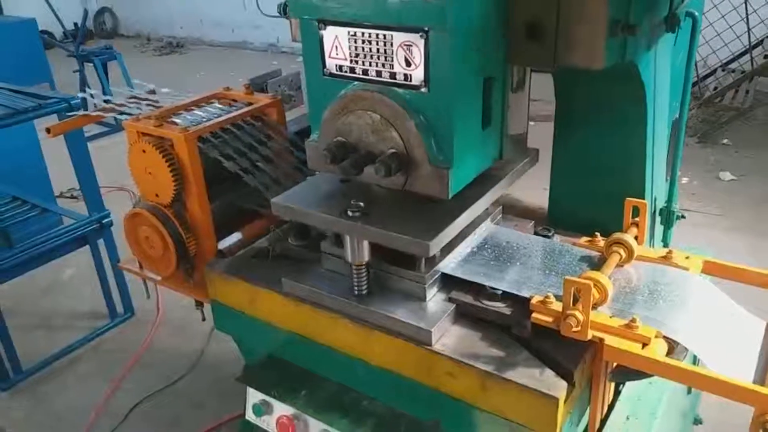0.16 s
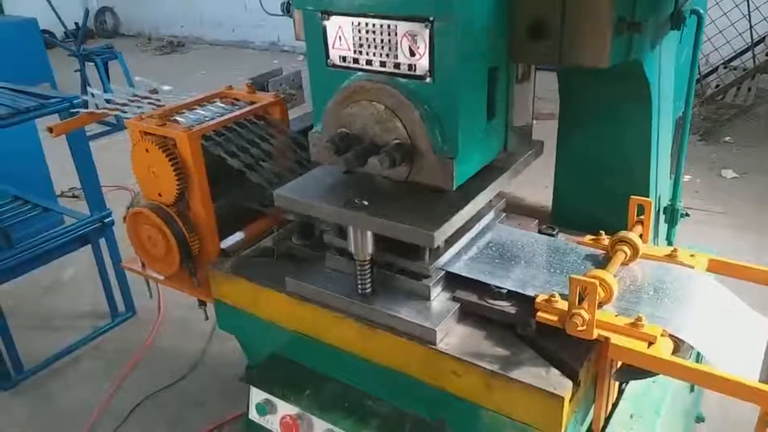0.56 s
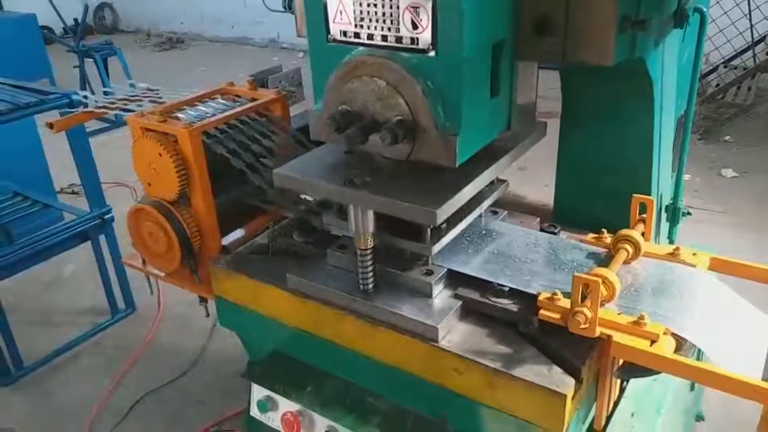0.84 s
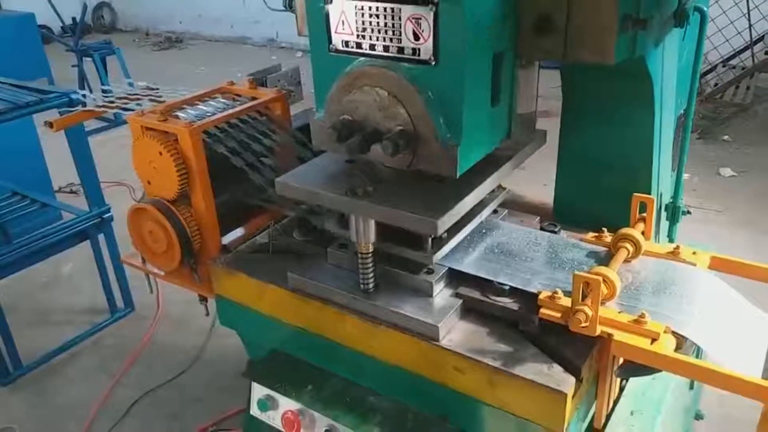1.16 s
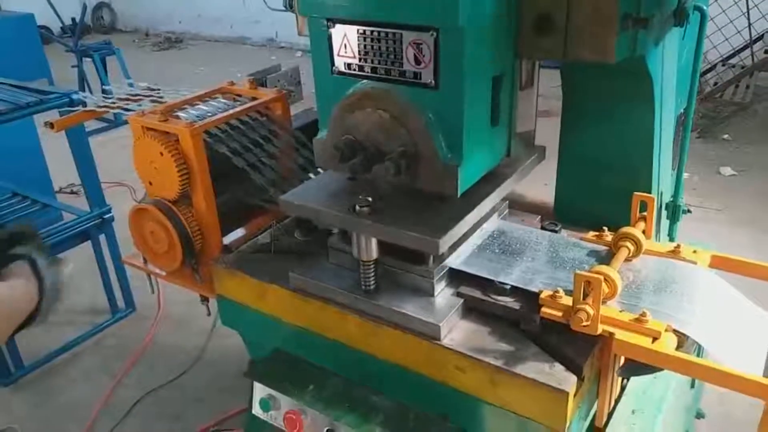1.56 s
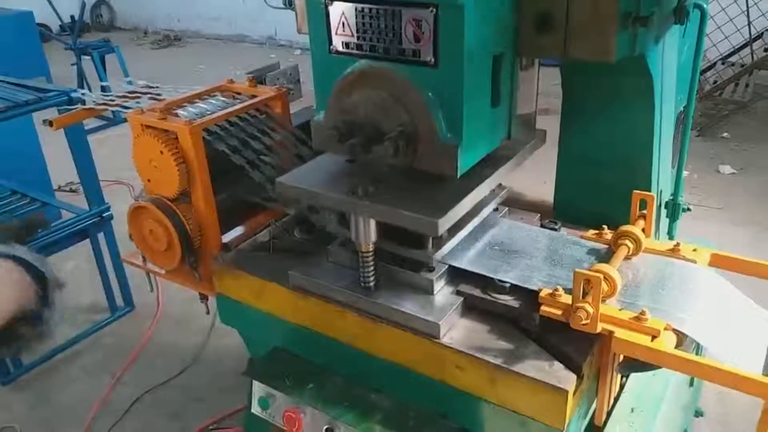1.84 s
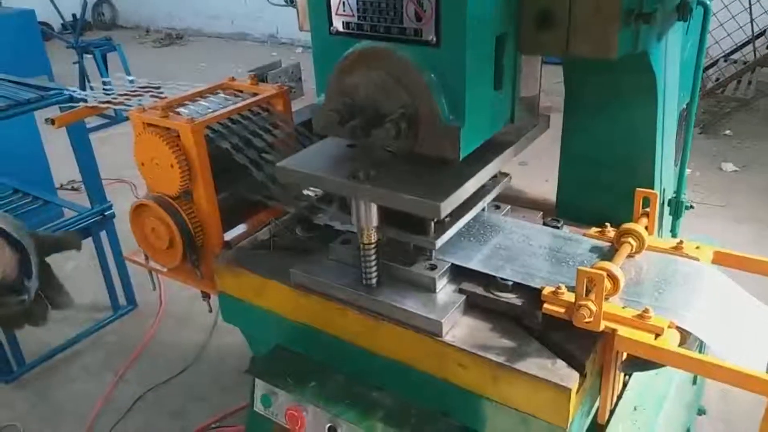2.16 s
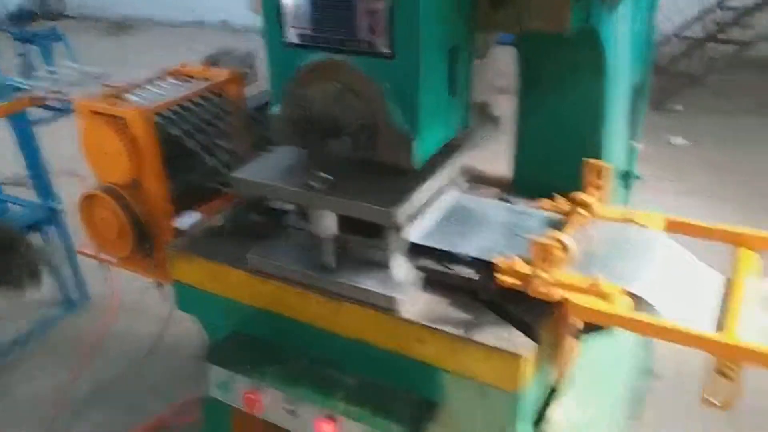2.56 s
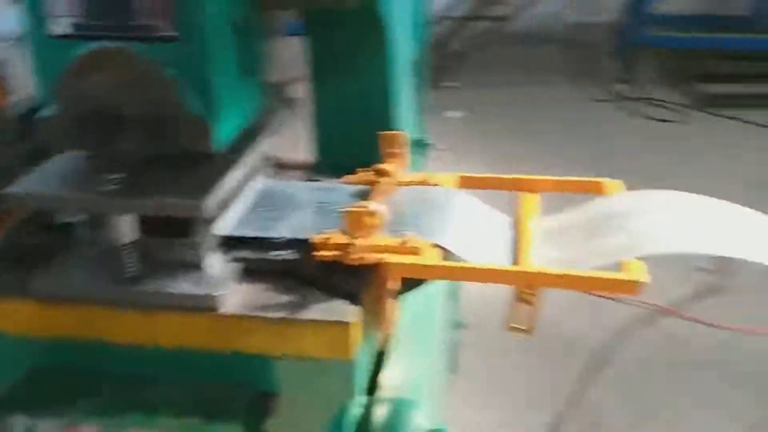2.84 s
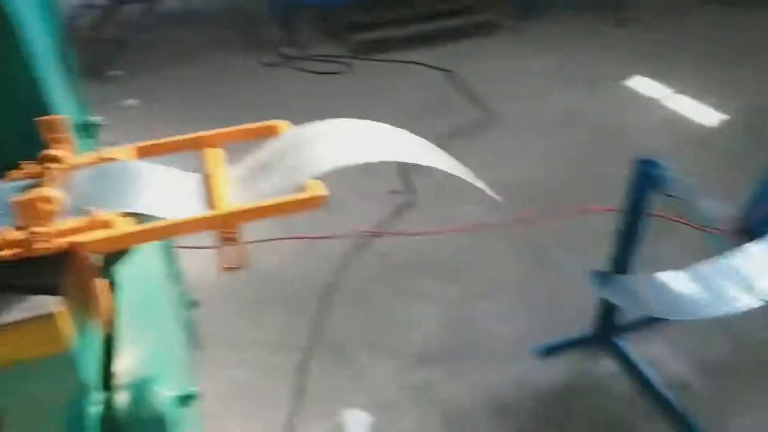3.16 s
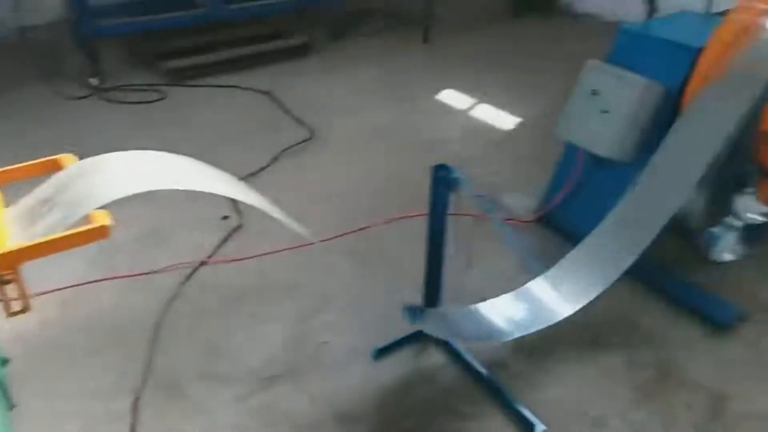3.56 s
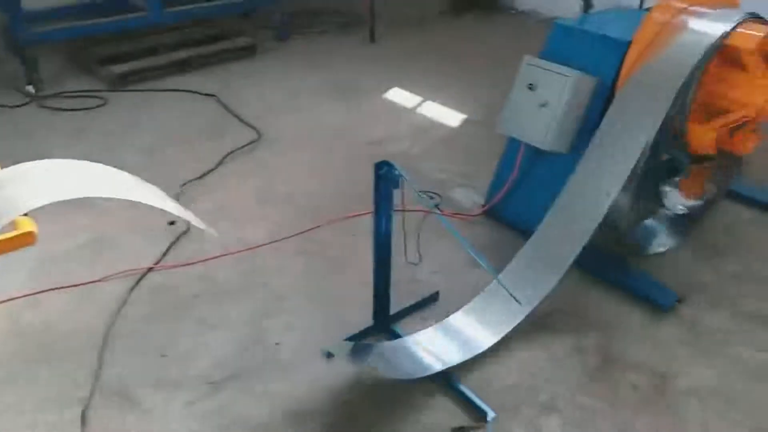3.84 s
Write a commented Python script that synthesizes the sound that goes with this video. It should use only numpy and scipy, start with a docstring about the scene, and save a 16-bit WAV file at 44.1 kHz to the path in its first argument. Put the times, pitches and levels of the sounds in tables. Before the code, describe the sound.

Heavy, regular bangs of a punch press echo through a workshop, with gear rumble between.

```python
"""Punch press, close up

Stereo microphone close to a press stamping sheet metal every 1.2 s in a hard-walled workshop. Gears roar,
the die knocks shut, the punch cracks through, frame and hall ring, the stripper clacks, the strip rattles.
Loose parts tick; late on, the strip unwinder rises to a shuddering hum. A limiter holds the blows down."""
import sys
import numpy as np
from scipy import signal
from scipy.io import wavfile
from scipy.ndimage import uniform_filter1d, minimum_filter1d

SR = 44100
rng = np.random.default_rng(int(sys.argv[2]) if len(sys.argv) > 2 else 0)


def int16_out(signal):
    """Quantize to a 16-bit WAV file."""
    q = np.round(np.clip(np.atleast_2d(signal).T, -1, 1) * 32767)
    wavfile.write(sys.argv[1], SR, q.astype(np.int16))


N = 176400

# The punch breaking through: start_s, level_db
BLOWS = [(.141, -1.5), (1.3345, -0.5), (2.529, -1), (3.723, -1.5)]
# The hall's answer to a blow: frequency_hz, level_db
BLOW_SPECTRUM = [(25, -51), (130, -30), (280, 8.5), (546, -11), (815, -3), (1450, -12), (2340, -16),
                 (5000, -31.5), (7590, -38.5), (10000, -74.5)]
# Die plates slamming inside the crack: after_blow_s, nominal_pitch_hz, level_db, t60_s
PLATE_SLAMS = [(0, 392.5, -1.5, 0.14), (.015, 890, 7, 0.02)]
# Modes of the press frame: pitch_hz, level_db, t60_s
FRAME_MODES = [(124.4, -16, 0.84), (228.4, -8.5, 0.95), (273.4, -6, 0.59), (324.3, -3.5, 0.51),
               (483.5, -7.5, 0.73), (630, -0.5, 0.41), (824, -1.5, 0.81), (999, 1.5, 0.21),
               (1318, -8.5, 0.49)]
# Die and stripper contacts: from_blow_s, level_db, brightness (0 dull, 1 sharp)
STROKE_KNOCKS = [(-.11, -22, 0.82), (-.09, -20.5, 0.69), (-.055, -11.5, 0.061), (.146, -19.5, 0.66),
                 (0.161, -17.5, 0.84)]
# A dull thump: frequency_hz, level_db
DULL_SPECTRUM = [(60, -10), (280, 26), (500, 20), (2000, -46), (10000, -51)]
# Sharp metal contact: frequency_hz, level_db
SHARP_SPECTRUM = [(60, -43.5), (300, -4), (800, -8), (2200, 4.5), (4000, -8.5), (7000, -20.5), (10000, -51)]
# Gear roar over one stroke: from_next_blow_s, level_db
GEAR_LOAD = [(-1.257, -21), (-0.85, -27.5), (-0.462, -45), (-0.35, -34), (-0.099, -27), (-0.026, -22)]
# Meshing teeth: frequency_hz, level_db
GEAR_SPECTRUM = [(25, -54), (120, -31), (233, 0.5), (500, -15), (800, 5.5), (1310, -4.5), (2400, -3),
                 (2720, -14), (5760, -19), (9280, -49), (10000, -84)]
# Modes of the sheet-metal strip: pitch_hz
STRIP_MODES = [2720, 3520, 3840, 4930, 5650, 6080, 7970, 8350]
# The unwinder's swell: time_s, level_db
UNWINDER_LEVEL = [(3.28, -36), (3.325, -21), (3.45, -17), (3.56, -15.5), (3.68, -13), (3.8, -22.5),
                  (4, -44.5)]
# Its motor hum: time_s, pitch_hz
UNWINDER_PITCH = [(3.5, 221.4), (3.65, 241.3), (3.8, 263)]
# Resonances of its stand: pitch_hz, width_hz, level_db
STAND_MODES = [(123.5, 20, -2.5), (170, 9.9, -6), (234.5, 24.2, 3.5), (292, 43, -11)]
# Loose parts: start_s, level_db
TICKS = [(0.0723, -25), (0.5017, -36.5), (.593, -35), (1.7791, -27.5), (1.799, -28), (1.834, -31),
         (2.764, -38.5), (2.886, -37), (2.946, -36), (3.032, -38), (3.53, -38), (3.618, -27),
         (3.842, -31.5)]
# One tick: frequency_hz, level_db
TICK_SPECTRUM = [(300, -39), (1500, -10), (3300, 2), (5500, 1), (7500, -10.5), (10000, -29)]
# The strip dragging over its guides: time_s, level_db
SCRAPE_LEVEL = [(2.7, -38), (2.95, -35), (3.25, -32), (3.6, -24), (3.9, -37)]
# The strip singing after a blow, struck by it: pitch_hz, level_db, t60_s
STRIP_RING_MODES = [(7390, -38, .5), (7720, -44, .4)]
# Workshop room tone: frequency_hz, level_db
DRONE_SPECTRUM = [(60, -37), (140, -26.5), (284, -4.5), (532, 4), (924, 6.5), (2400, -5.5), (5760, -38.5),
                  (8600, -55.5), (10000, -78.5)]
# Reverberation of the hall: frequency_hz, t60_s
HALL_DECAY = [(60, 0.19), (250, 1.55), (800, 2.08), (2000, 1.74), (4000, 1.35), (9000, 0.93)]
# Likeness of left and right at the microphone: frequency_hz, correlation
STEREO_LIKENESS = [(60, -0.9), (140, 1), (330, 0.95), (760, 0.61), (1760, -0.29), (9560, 0.46)]


def amp(db):
    return 10 ** (np.asarray(db) / 20)


def unit_rms(x):
    return x / np.sqrt(np.mean(x ** 2) + 1e-20)


def at_hz(points, hz):
    """Read a table along a logarithmic frequency axis."""
    table_hz, value = np.transpose(points)
    return np.interp(np.log(hz + 1), np.log(table_hz + 1), value)


def at_time(points, t):
    return np.interp(t, *np.transpose(points))


def add(mix, start_s, sound):
    part = mix[:, max(round(start_s * SR), 0):][:, :sound.shape[1]]
    part += sound[:, :part.shape[1]]


def resonate(x, hz, width_hz):
    """A fixed resonance of gain 1."""
    turn = np.exp(2j * np.pi * hz * np.arange(x.shape[-1]) / SR)
    pole = np.exp(-np.pi * width_hz / SR)
    return 2 * (turn * signal.lfilter([1 - pole], [1, -pole], x / turn)).real


def snap(count, boost_db=7, fade_s=.006):
    """Gain that sharpens the first milliseconds of a contact."""
    return amp(boost_db * np.exp(-np.arange(count) / (fade_s * SR)))


def hall_noise(count, colour_db, ring=np.inf, patchy_db=3.5, steel_db=5.5):
    """Stereo noise starting near rms 1; each band dies away in ring times the hall's t60."""
    frames, hz = count // 128 + 5, np.fft.rfftfreq(512, 1 / SR)
    a, b, c, d, patches, steel = rng.standard_normal((frames, 257, 6)).T
    # Narrow, slowly shifting resonances of the steel, at full depth above 1500 Hz.
    steel = unit_rms(uniform_filter1d(steel, size=30, axis=1)) * np.minimum(hz / 1500, 1)[:, None]
    patches = unit_rms(uniform_filter1d(uniform_filter1d(patches, size=5, axis=0), size=20, axis=1))
    likeness = np.clip(at_hz(STEREO_LIKENESS, hz), -1, 1)[:, None]
    left = a + 1j * b
    right = likeness * left + np.sqrt(1 - likeness ** 2) * (c + 1j * d)
    ripple_db = patchy_db * np.clip(patches, -3, 1.5) + steel_db * np.clip(steel, -3, 2)
    spectra = np.array([left, right]) * amp(colour_db(hz)[:, None] + ripple_db)
    rms = np.sqrt(np.mean(signal.istft(spectra, nperseg=512, noverlap=384)[1] ** 2))
    spectra *= amp(-60 * np.arange(frames) * 128 / SR / (ring * at_hz(HALL_DECAY, hz))[:, None])
    return signal.istft(spectra, nperseg=512, noverlap=384)[1][:, :count] / rms


def blows(crack_s=.0235, crack_db=6, body_db=-8.5):
    """The punch cracks through as the die plates slam; the frame rings and the hall answers."""
    out, t = np.zeros((2, N)), np.arange(SR) / SR
    short = t[:2048]
    gate = np.clip((crack_s + .001 - short) / .002, 0, 1) * np.minimum(short / .0005, 1)
    brightened = lambda hz: at_hz(BLOW_SPECTRUM, hz) + 4 * np.log2(hz + 500)
    for start_s, db in BLOWS:
        crack = hall_noise(len(short), brightened, ring=.1)
        for late_s, hz, slam_db, t60 in PLATE_SLAMS:
            age = np.maximum(short - late_s, 0)
            pitch_hz = hz * rng.uniform(.87, 1.05)
            crack += amp(slam_db - 60 * age / t60) * np.sin(2 * np.pi * pitch_hz * age)
        add(out, start_s, amp(db + crack_db) * gate * unit_rms(crack) * snap(len(short)) ** .5)
        hall = hall_noise(SR, lambda hz: at_hz(BLOW_SPECTRUM, hz), ring=.68)
        body = hall + amp(-10.5) * frame_ring(SR)
        add(out, start_s, amp(db + body_db) * np.minimum(t / .0011, 1) * body)
    return out


def frame_ring(count, ring=1):
    """All frame modes start at once, weighted a little differently each time; ring scales their t60."""
    t = np.arange(count) / SR
    hz, db, t60 = np.transpose(FRAME_MODES)[:, :, None]
    weight, phase = rng.random((2, len(FRAME_MODES), 1))
    modes = amp(db + 4.2 * weight - 60 * t / (ring * t60)) * np.sin(2 * np.pi * (hz * t + phase))
    return modes.sum(0) * np.minimum(t / .0028, 1)


def knocks():
    """The die's smaller contacts repeat around every blow, from dull thump to sharp clack."""
    out, t = np.zeros((2, N)), np.arange(SR // 4) / SR
    for blow_s, _ in BLOWS:
        for offset_s, db, bright in STROKE_KNOCKS:
            colour = lambda hz: (bright * at_hz(SHARP_SPECTRUM, hz)
                                 + (1 - bright) * at_hz(DULL_SPECTRUM, hz))
            rise = np.minimum(t / (.0005 + .025 * (1 - bright) ** 2), 1)  # dull thumps swell in
            knock = rise * snap(len(t)) ** bright * hall_noise(len(t), colour, ring=.13)
            add(out, blow_s + offset_s, amp(db) * knock)
    return out


def gears(taps_per_s=640, spread_db=4, rattle_db=-1.5):
    """Tooth noise and a dense rattle through the frame swell as the ram comes down."""
    t = np.arange(N) / SR
    blow_times = np.append(np.transpose(BLOWS)[0], 2 * BLOWS[-1][0] - BLOWS[-2][0])
    from_next_blow_s = t - blow_times[np.searchsorted(blow_times, t)]
    strength = amp(spread_db * np.minimum(rng.exponential(1, (2, N)), 3))
    taps = strength * (rng.random((2, N)) < taps_per_s / SR) * rng.choice([-1, 1], (2, N))
    damped_frame = frame_ring(SR // 4, ring=.18)
    rattle = signal.oaconvolve(taps + .65 * taps[::-1], damped_frame[None], axes=1)[:, :N]
    teeth = hall_noise(N, lambda hz: at_hz(GEAR_SPECTRUM, hz), patchy_db=2)
    return amp(at_time(GEAR_LOAD, from_next_blow_s)) * (teeth + amp(rattle_db) * unit_rms(rattle))


def strip_clatter(fade_db_per_s=62, t60_s=.06, bend=.04):
    """After a blow the strip bounces on its guides; each bounce rings one mode, shifted by bending."""
    out, t = np.zeros((2, N)), np.arange(N) / SR
    shake = sum((t > s) * amp(-fade_db_per_s * np.maximum(t - s, 0)) for s, _ in BLOWS)
    age = t[:4096]
    bounces_per_s = 230 / len(STRIP_MODES)  # for each pitch and side
    for hz in np.outer(STRIP_MODES, [1 - bend, 1, 1 + bend]).ravel():
        bounces = rng.standard_normal((2, N)) * (rng.random(N) < bounces_per_s / SR)
        ring = (STRIP_MODES[0] / hz) ** 1.5 * amp(-60 * age / t60_s) * np.sin(2 * np.pi * hz * age)
        out += signal.oaconvolve(shake * (bounces + bounces[::-1] / 2), ring[None], axes=1)[:, :N]
    return amp(-27) * out


def unwinder(jolts_per_s=24, shudder_db=-2, hum_db=-7.5, hum_from_s=3.45):
    """Uneven jolts shake the stand, faintly at first, then swelling as the motor hum enters and climbs."""
    t = np.arange(N) / SR
    unevenness = 12 * uniform_filter1d(rng.standard_normal(N), size=2000)
    jolt_phase = (np.cumsum(jolts_per_s * (1 + unevenness)) / SR) % 1
    drive = (.3 + np.exp(-jolt_phase / .2)) * rng.standard_normal(N)
    stand = sum(amp(db) * unit_rms(resonate(resonate(drive, hz, width), hz, 6 * width))
                for hz, width, db in STAND_MODES)
    hum = np.sin(2 * np.pi * np.cumsum(at_time(UNWINDER_PITCH, t)) / SR)
    hum *= np.clip((t - hum_from_s) / .1, 0, 1)
    return amp(at_time(UNWINDER_LEVEL, t)) * (amp(shudder_db) * unit_rms(stand) + amp(hum_db) * hum)


def loose_parts():
    """Small metal parts tick with a brief bright tail, just right of centre."""
    out, pan_db = np.zeros((2, N)), np.array([[-1], [1]])
    for start_s, db in TICKS:
        tick = hall_noise(SR // 5, lambda hz: at_hz(TICK_SPECTRUM, hz), ring=.16, patchy_db=2.5)
        add(out, start_s, amp(db + pan_db) * snap(SR // 5) ** .5 * tick)
    return out


def strip_scrape():
    """The strip drags over its guides with a patchy hiss."""
    hiss = hall_noise(N, lambda hz: at_hz(SHARP_SPECTRUM, hz), patchy_db=3)
    return amp(at_time(SCRAPE_LEVEL, np.arange(N) / SR)) * hiss


def squeak_and_strip_ring(lead_s=.086, squeak_hz=(8950, 9600), squeak_db=-43):
    """The guide posts chirp before each blow; the strip sings after it, high and wavering."""
    out, t = np.zeros((2, N)), np.arange(SR // 2) / SR
    swell = np.exp(-(t / .016 - 1.1) ** 2)
    for blow_s, _ in BLOWS:
        hiss = rng.standard_normal((2, len(t)))
        hiss = hiss + hiss[::-1] / 2
        squeak = abs(hiss[0]) * unit_rms(sum(resonate(hiss, hz, 250) for hz in squeak_hz))
        add(out, blow_s - lead_s, amp(squeak_db) * swell * squeak)
        for hz, db, t60 in STRIP_RING_MODES:
            tone = unit_rms(resonate(resonate(hiss, hz, 40), hz, 200))
            add(out, blow_s, amp(db - 60 * t / t60) * tone)
    return out


def shop_drone(level_db=-35.5):
    """Steady room tone behind the press."""
    return amp(level_db) * hall_noise(N, lambda hz: at_hz(DRONE_SPECTRUM, hz), patchy_db=2)


def scene():
    """The workshop as it reaches the microphone."""
    return (shop_drone() + blows() + knocks() + loose_parts() + strip_clatter()
            + squeak_and_strip_ring() + gears() + unwinder() + strip_scrape())


def record(dry, bass_cut_hz=90, threshold_db=-8, ahead_s=.007, clip_level=.82, top_hz=9900):
    """Microphone bass cut; a look-ahead limiter ducks just before each blow; soft clipping; band limit."""
    dry = signal.lfilter(*signal.butter(2, bass_cut_hz, "high", fs=SR), dry)
    level_db = 10 * np.log10(abs(uniform_filter1d((dry ** 2).mean(0), size=150)) + 1e-12)
    over_db = np.maximum(level_db - threshold_db, 0)
    ahead = round(ahead_s * SR) // 2 * 2
    coming_db = -minimum_filter1d(-over_db, size=ahead + 1, origin=-ahead // 2)
    eased_db = np.maximum(uniform_filter1d(coming_db, size=150),
                          uniform_filter1d(coming_db, size=400, origin=-199))
    limited = dry / amp(.62 * eased_db)
    clipped = limited / (1 + (limited / clip_level) ** 4) ** .25
    low_pass = signal.firwin(511, top_hz, window=("kaiser", 9), fs=SR)
    return signal.oaconvolve(clipped, low_pass[None], "same")


dry = scene()
out = record(dry)
int16_out(out)
```